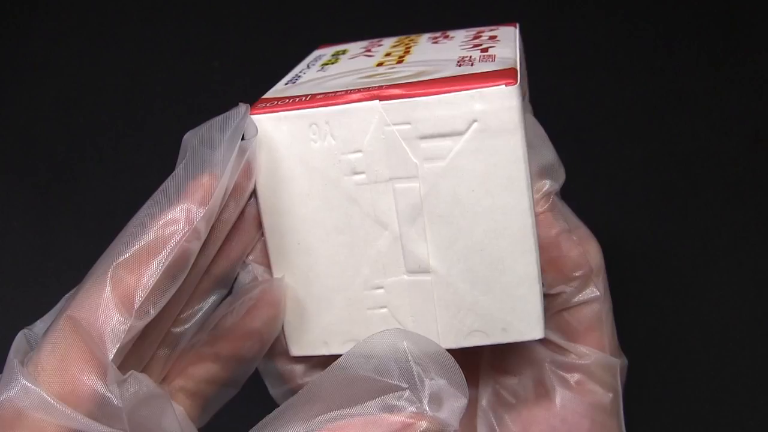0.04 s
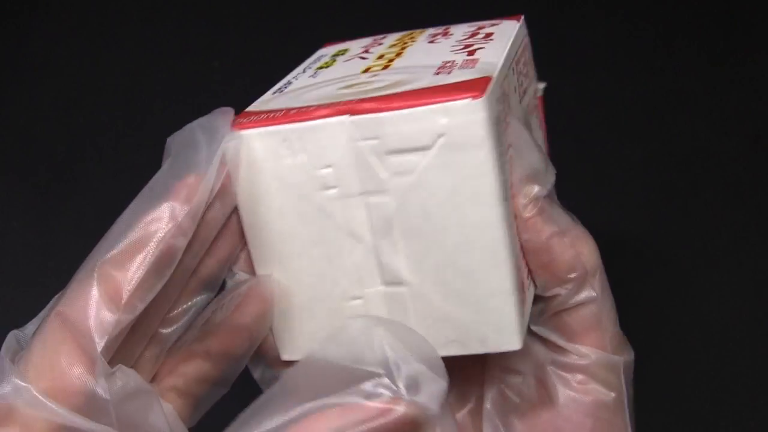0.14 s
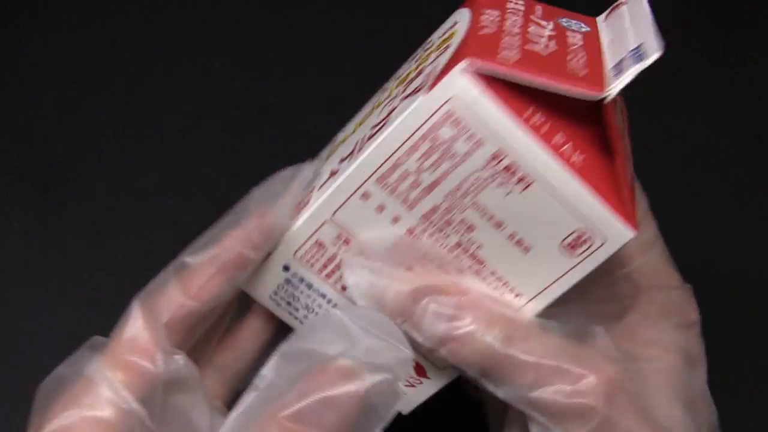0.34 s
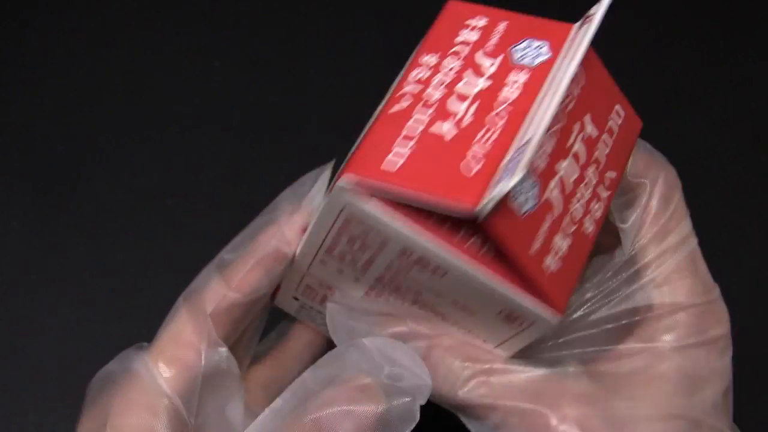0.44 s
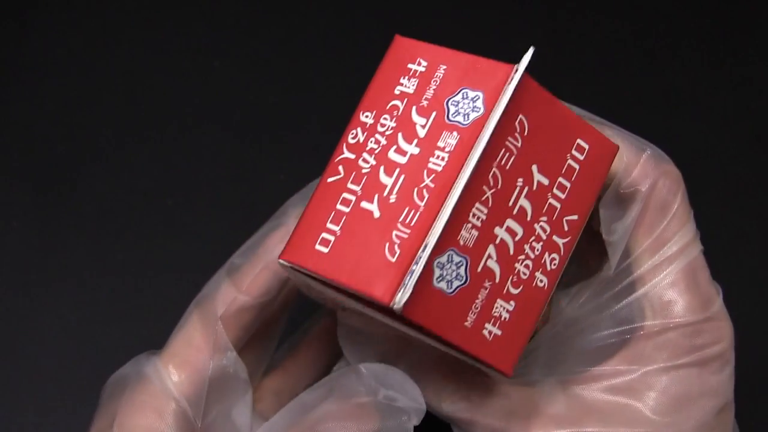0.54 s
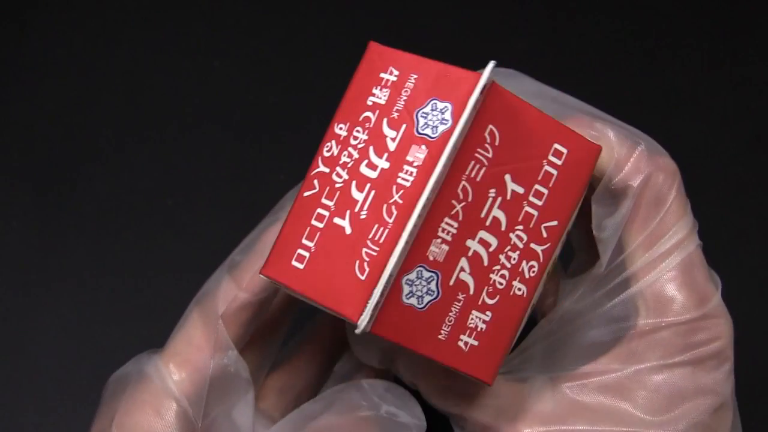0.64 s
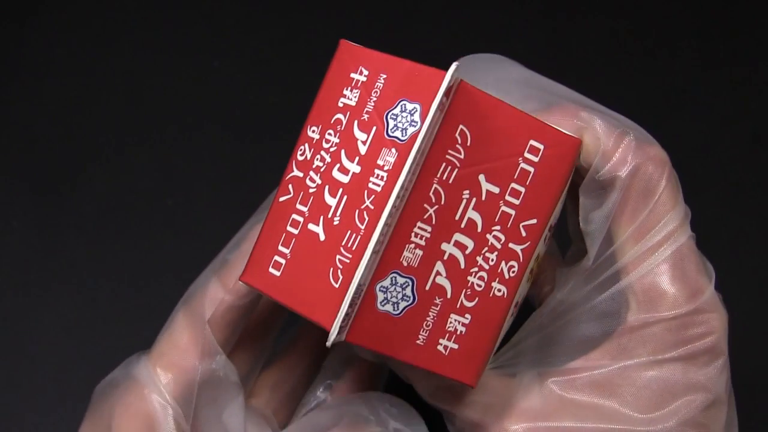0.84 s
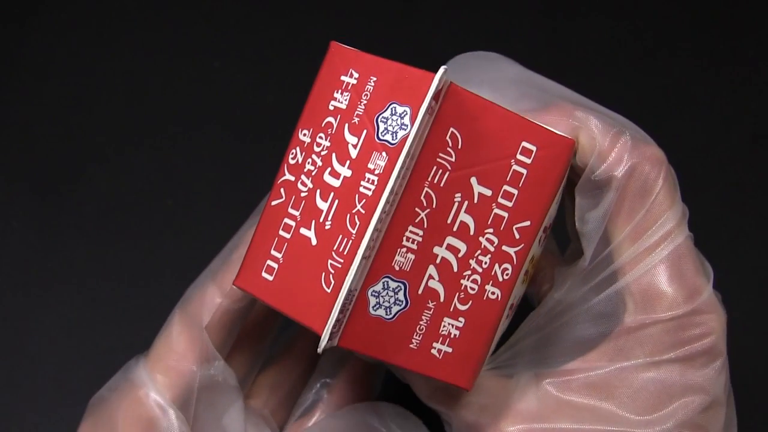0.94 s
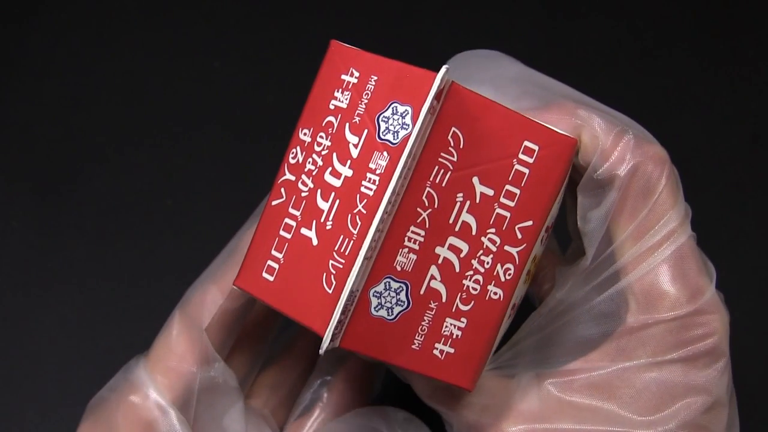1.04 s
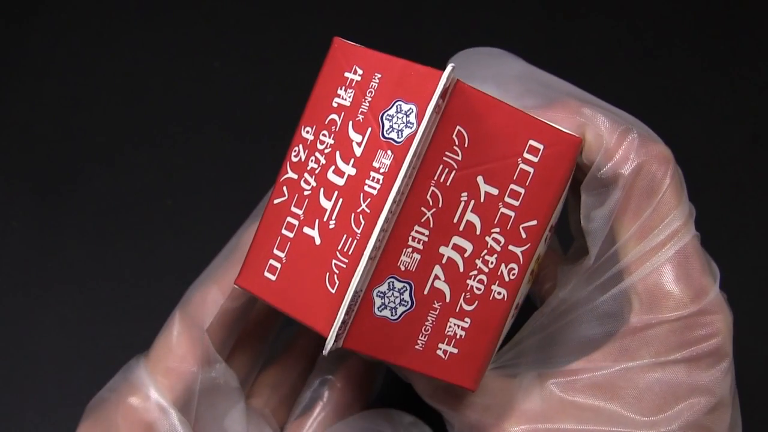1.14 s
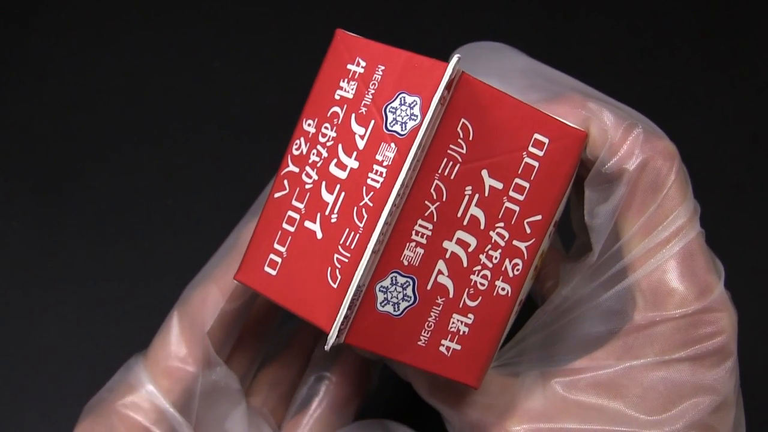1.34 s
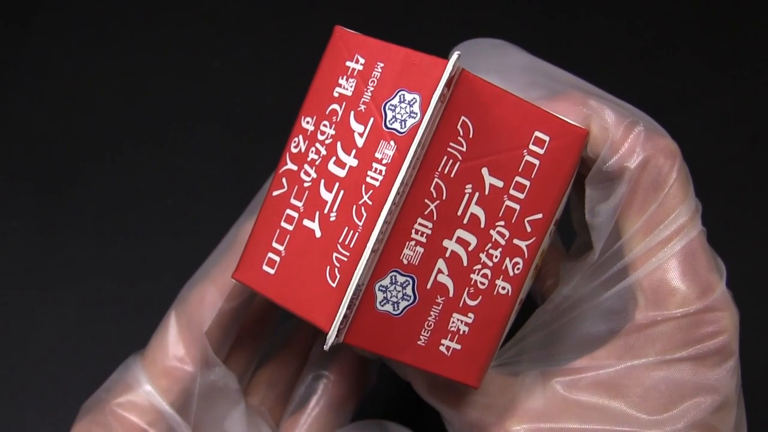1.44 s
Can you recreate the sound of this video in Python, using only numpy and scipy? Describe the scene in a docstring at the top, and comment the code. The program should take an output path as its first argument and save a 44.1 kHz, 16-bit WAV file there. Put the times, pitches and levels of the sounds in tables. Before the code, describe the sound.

Crinkly plastic-film rustle on a small coated carton, with sharp little snaps, then near quiet

```python
"""Gloved hands on a paper carton

Close to a camera microphone in a quiet room, hands in thin plastic gloves turn a paper carton.
The film slides over the coated board as a hiss and rasp of dense random slips with small ticks;
its creases snap as struck resonances, and the hollow box rings briefly as damped tones.
Sparse echoes give the nearby reflections and the walls; a faint wavering hum and hiss fill the room."""
import sys
import numpy as np
from scipy import signal
from scipy.fft import rfft, irfft
from scipy.io import wavfile
from scipy.ndimage import uniform_filter1d

SR = 44100
rng = np.random.default_rng(int(sys.argv[2]) if len(sys.argv) > 2 else 0)


def unload_audio(sound):
    """Save the sound as a 16-bit wav file, at the path given as the first command line argument."""
    columns = np.transpose(np.atleast_2d(sound))
    # keep every value between -1 and 1, then stretch to whole-number steps
    steps = np.round(np.clip(columns, -1, 1) * 32767)
    wavfile.write(sys.argv[1], SR, steps.astype(np.int16))


N = 66150  # length in samples

# Film sliding on the board: start_s, hiss_level_db, rasp_level_db
SLIDE_LEVELS = [(.17, -77, -99), (0.204, -70.5, -59.5), (.24, -56.5, -58.5), (.28, -49, -56),
                (0.342, -48, -51), (0.377, -41, -48.5), (0.402, -49.5, -48), (0.422, -39.5, -48.5),
                (0.448, -47.5, -51.5), (.57, -49, -56.5), (0.596, -53.5, -52), (0.632, -67, -67),
                (.69, -63.5, -67), (.713, -56.5, -61), (0.749, -65.5, -61), (.825, -82, -79),
                (0.843, -59.5, -54.5), (0.886, -72, -69), (.905, -67, -66.5), (.915, -56, -63),
                (.96, -50, -66.5), (1.01, -56, -65.5), (1.11, -72.5, -69), (1.28, -73.5, -71),
                (1.34, -65.5, -71), (1.387, -67.5, -65), (1.5, -76, -75)]
# Top treble of the slide, over the hiss level: start_s, level_db
SHEEN_LEVELS = [(.22, -22), (.38, -7.5), (.5, -15.5), (.575, -1.5), (.62, -28), (.72, -9.5), (.9, -40)]
# Colour of the film's bright hiss: frequency_hz, level_db
HISS_COLOUR = [(1500, -39), (3000, -1.5), (4500, -4.5), (5500, 0), (7000, 1), (9500, -3), (12000, -9),
               (12900, -16), (13200, -61)]
# Colour of the board's lower rasp: frequency_hz, level_db
RASP_COLOUR = [(60, -57), (200, -8.5), (400, 0), (800, -3), (1500, 0.5), (2700, 1.5), (3600, -5.5),
               (4500, 0), (7000, -42)]
# Creases of the film snapping: start_s, peak_db, pitch_hz, sharpness (pitch over bandwidth),
# bright_db (over the low ring), flurry_db (over the first slip)
CREASE_SNAPS = [(0.2067, -31, 2970, 2.3, -4, -7), (0.227, -36.5, 1600, 2.3, -14, -11),
                (.2850, -32, 1700, 2.5, -13, -26), (0.3007, -31, 2900, 1.7, 5, -24),
                (0.3347, -27.5, 1900, 0.76, 5, -33), (0.3458, -30.5, 1330, 4.2, -1.5, -20),
                (.3690, -22, 2950, 1.3, 1.5, -16), (0.3729, -23.5, 2700, 1.5, -3, -9),
                (0.3792, -21.5, 2130, 0.58, -7.5, 6.5), (0.3959, -20, 2690, 5.3, -8, -11),
                (0.4244, -25, 2500, 0.78, -13, -26), (0.4595, -25, 2760, 0.94, -10.5, 3),
                (0.491, -35.5, 1440, 3, -10, -22), (0.5267, -30.5, 1530, 0.63, -1, -15.5),
                (0.5814, -28.5, 1900, 1.6, -1, -16), (.5968, -42, 2520, 1.8, -6, -32.5),
                (0.7056, -23, 2760, 0.98, -8.5, -24), (0.7121, -28.5, 2680, 0.94, 4, 0.5),
                (0.7369, -31.5, 1900, 0.73, -9, -17.5), (0.7451, -32, 2220, 1.4, 3, -22),
                (0.8295, -16.5, 2310, 1.7, -2, -18), (.8412, -32, 1590, 0.63, -19, -18),
                (0.8445, -39, 2800, 3.7, 3, -13), (0.8646, -38, 1860, 2.5, -7, -17),
                (0.964, -40.5, 2420, 3, -14, -13), (1.0257, -38.5, 2040, 0.88, -20, -12.5),
                (1.0626, -33, 3290, 1.7, -4.5, -13), (1.3003, -40.5, 3480, 1.4, -10, -16),
                (1.342, -41.5, 3270, 2.6, -0.5, -14)]
# The hollow box thumped by a shifting finger: start_s, level_db, pitch_hz, t60_s
BOX_THUMPS = [(0.2078, -25.5, 1130, 0.0047), (0.3968, -19.5, 1480, 0.0049), (.3988, -25, 850, 0.018),
              (.404, -28, 840, 0.03), (.417, -41, 474, 0.048), (.4603, -27.5, 700, 0.0042),
              (.527, -41, 760, 0.02), (0.5825, -32.5, 950, 0.0063), (.843, -51.5, 475, 0.02),
              (1.063, -44.5, 400, 0.012), (1.0625, -37.5, 1510, 0.017), (1.063, -30.5, 2270, 0.0074),
              (1.124, -42, 390, 0.0074)]
# Colour of the reflections, opposite in the two ears: frequency_hz, level_db
SIDE_COLOUR = [(500, -22), (2500, -28), (6000, -16), (12000, -10)]
# Colour of the room hiss: frequency_hz, level_db
ROOM_COLOUR = [(20, -18.5), (60, -14), (130, -7), (300, -2), (500, -6), (900, -9), (2500, -14.5),
               (5000, -16), (10500, -27), (11800, -26.5), (12500, -84)]
# Left-right likeness of the room hiss: frequency_hz, likeness (0 to 1)
ROOM_LIKENESS = [(50, 0.49), (1000, 0.09), (3000, 0.69), (10000, 0.38)]
# Partials of the hum: multiple of HUM_HZ, level_db
HUM_PARTIALS = [(2, -79), (3, -79.5), (6, -83)]

HISS_SLIPS_PER_S, HISS_SPREAD_DB = 14000, 1.5
RASP_SLIPS_PER_S, RASP_SPREAD_DB = 3700, 3
FLICKER_DB, FLICKER_S = 1.5, 0.0055  # the pressure of the fingers is uneven
SHEEN_BAND_HZ = [11570, 13330]  # the top treble
CRINKLES_PER_S, CRINKLE_DB = 260, -4  # level over the coloured rasp
CRINKLE_LOW_HZ, CRINKLE_HIGH_HZ, CRINKLE_PATCHES = 700, 5600, 12
CRINKLE_DECAY_CYCLES = 0.75  # cycles for a tick to fall to 1/e
BRIGHT_HZ, BRIGHT_WIDTH_HZ = 5935, 2170
AIR_HZ, AIR_WIDTH_HZ = 11020, 4100
AIR_DB, AIR_PER_FLURRY = -1.5, 0.7  # over the bright part; dB added per dB of flurry
SNAP_HOLD_S, SNAP_T60_S, SNAP_TOP_HZ = 0.00059, 0.0093, 12160
THUMP_RISE_S = 0.00062
LOW_CUT_HZ = 95
NEAR_DB, NEAR_T60_S = 2.5, 0.0092
WALLS_DB, WALLS_T60_S = -19, 0.19
ROOM_DB, HUM_HZ, HUM_WAVER = -63.5, 68.17, 0.01043  # waver is an RMS share of the pitch
NOTCH_HZ, NOTCH_WIDTH_HZ, NOTCH_SHARE = 4430, 1300, 0.52  # the microphone's dip
EDGE_HZ = 14400


def amp(db):
    """Turns decibels into an amplitude factor."""
    return 10 ** (np.asarray(db, float) / 20)


def evened(x):
    """Scales a signal to unit RMS."""
    return x / np.sqrt(np.mean(x ** 2) + 1e-20)


def read(points, hz):
    """Reads a spectrum table along a logarithmic frequency axis."""
    f, value = np.transpose(points)
    return np.interp(np.log(hz + 1), np.log(f + 1), value)


def colour(x, points):
    """Filters by a spectrum table."""
    gain = amp(read(points, np.fft.rfftfreq(N, 1 / SR)))
    return irfft(rfft(x) * gain, N)


def add(mix, start_s, sound):
    """Lays a sound into the mix, cut off at the end."""
    part = mix[round(start_s * SR):][:len(sound)]
    part += sound[:len(part)]


def ring(x, hz, width_hz):
    """A two-pole resonance."""
    return signal.lfilter(*signal.iirpeak(hz, hz / width_hz, SR), x)


def butter(x, order, hz, kind):
    """A Butterworth filter."""
    return signal.sosfilt(signal.butter(order, hz, kind, fs=SR, output="sos"), x)


def slips(per_s, spread_db):
    """Random tiny slips of either sign; a few are larger."""
    size_db = spread_db * np.minimum(rng.exponential(1, N), 4)
    size = amp(size_db) * rng.choice([-1., 1.], N)
    return size * (rng.random(N) < per_s / SR)


def slide():
    """Dense slips of film on board: a bright hiss, its top treble, and a lower rasp with small ticks."""
    t = np.arange(N) / SR
    start_s, hiss_db, rasp_db = np.transpose(SLIDE_LEVELS)
    hiss_db = np.interp(t, start_s, hiss_db)
    rasp_db = np.interp(t, start_s, rasp_db)
    sheen_db = hiss_db + np.interp(t, *np.transpose(SHEEN_LEVELS))
    uneven = uniform_filter1d(rng.standard_normal(N), round(FLICKER_S * SR))
    flicker_db = FLICKER_DB * evened(uneven)

    film = slips(HISS_SLIPS_PER_S, HISS_SPREAD_DB)
    hiss = evened(colour(film, HISS_COLOUR))
    sheen = evened(butter(film, 8, SHEEN_BAND_HZ, "bandpass"))
    board = slips(RASP_SLIPS_PER_S, RASP_SPREAD_DB)
    rasp = evened(colour(board, RASP_COLOUR)) + amp(CRINKLE_DB) * crinkles()
    return hiss * amp(hiss_db + flicker_db) + sheen * amp(sheen_db) + rasp * amp(rasp_db)


def crinkles():
    """Small random ticks as fast-damped sines, each patch of film with its own pitch."""
    out, t = np.zeros(N), np.arange(300) / SR
    for hz in np.geomspace(CRINKLE_LOW_HZ, CRINKLE_HIGH_HZ, CRINKLE_PATCHES):
        tick = np.sin(2 * np.pi * hz * t) * np.exp(-t * hz / CRINKLE_DECAY_CYCLES)
        starts = slips(CRINKLES_PER_S / CRINKLE_PATCHES, 2.9)
        out += signal.oaconvolve(starts, tick / np.linalg.norm(tick))[:N]
    return evened(out)


def snaps():
    """Each crease gives one sharp slip and a short flurry, ringing low in the board and bright in the film."""
    out, t = np.zeros(N), np.arange(900) / SR
    fade_db = -60 * np.maximum(t - SNAP_HOLD_S, 0) / SNAP_T60_S
    noises = rng.standard_normal((len(CREASE_SNAPS), len(t)))
    for (start_s, peak_db, hz, sharpness, bright_db, flurry_db), noise in zip(CREASE_SNAPS, noises):
        drive = (t == 0) + noise * amp(flurry_db + fade_db)
        width_hz = hz / max(sharpness, .6)
        low = ring(ring(drive, hz, width_hz), hz, 2 * width_hz)
        bright = drive
        for widening in (2, 2, 1):
            bright = ring(bright, BRIGHT_HZ, widening * BRIGHT_WIDTH_HZ)
        air = ring(ring(drive, AIR_HZ, AIR_WIDTH_HZ), AIR_HZ, AIR_WIDTH_HZ)
        air_db = bright_db + AIR_DB + AIR_PER_FLURRY * flurry_db
        parts = [(0, low), (bright_db, bright), (air_db, air)]
        snap = sum(amp(db) * part / np.linalg.norm(part) for db, part in parts)
        add(out, start_s, amp(peak_db) * snap / abs(snap).max())
    return butter(out, 10, SNAP_TOP_HZ, "lowpass")


def thumps():
    """Soft-starting damped tones of the hollow box."""
    out, t = np.zeros(N), np.arange(2500) / SR
    rise = 1 - np.exp(-t / THUMP_RISE_S)
    for start_s, level_db, hz, t60_s in BOX_THUMPS:
        fade = amp(level_db - 60 * t / t60_s)
        add(out, start_s, fade * rise * np.sin(2 * np.pi * hz * t))
    return out


def echoes(t60_s):
    """Reflections as sparse taps of random sign dying away, with unit total energy."""
    t = np.arange(SR // 4) / SR
    taps = rng.choice([-1., 1.], len(t)) * (rng.random(len(t)) < .1)
    taps = taps * amp(-60 * t / t60_s) * (t > .0006)
    return taps / np.linalg.norm(taps)


def room():
    """Steady hiss, partly alike left and right, and a hum of wavering harmonics."""
    a, b = rfft(rng.standard_normal((2, N)))
    same = np.clip(read(ROOM_LIKENESS, np.fft.rfftfreq(N, 1 / SR)), 0, 1)
    right = same * a + np.sqrt(1 - same ** 2) * b
    hiss = evened(colour(irfft(np.array([a, right]), N), ROOM_COLOUR))

    waver = evened(uniform_filter1d(rng.standard_normal(N), 4000))
    turn = 2 * np.pi * np.cumsum(HUM_HZ * (1 + HUM_WAVER * waver)) / SR
    hum = np.zeros(N)
    for multiple, level_db in HUM_PARTIALS:
        phase = 2 * np.pi * rng.random()
        hum += amp(level_db) * np.sqrt(2) * np.sin(multiple * turn + phase)
    return (amp(ROOM_DB) * hiss + hum) * amp([[.8], [-.8]])  # slightly louder left


def scene():
    """Hands near the centre, reflections spread to the sides, then walls and room."""
    hits = snaps() + thumps()
    hands = butter(slide() + hits, 4, LOW_CUT_HZ, "highpass")
    near = amp(NEAR_DB) * signal.fftconvolve(hits, echoes(NEAR_T60_S))[:N]
    side = colour(slide() + near, SIDE_COLOUR)  # a second, independent draw of the slips
    walls = np.array([signal.fftconvolve(hands, echoes(WALLS_T60_S))[:N] for ear in range(2)])
    direct = hands * amp([[.2], [-.2]])
    return direct + side * np.array([[1], [-1]]) + amp(WALLS_DB) * walls + room()


def record(dry):
    """The microphone's dip in the lower treble, then the band limit."""
    dipped = dry - NOTCH_SHARE * ring(dry, NOTCH_HZ, NOTCH_WIDTH_HZ)
    band_limit = signal.firwin(511, EDGE_HZ, window=("kaiser", 9), fs=SR)
    return signal.oaconvolve(dipped, band_limit[None], "same")


dry = scene()
out = record(dry)
unload_audio(out)
```